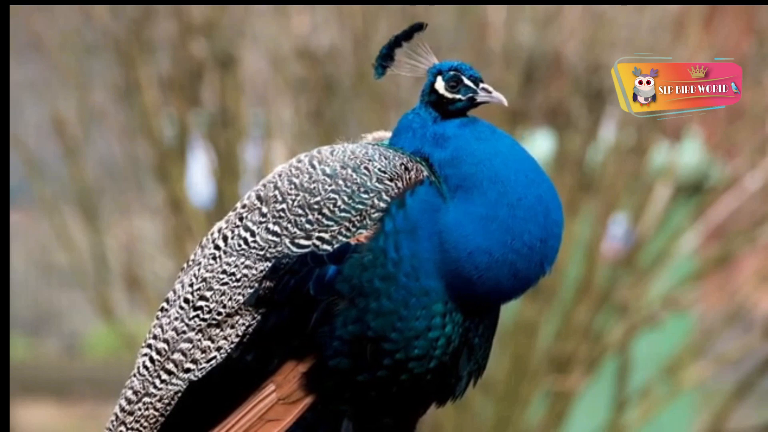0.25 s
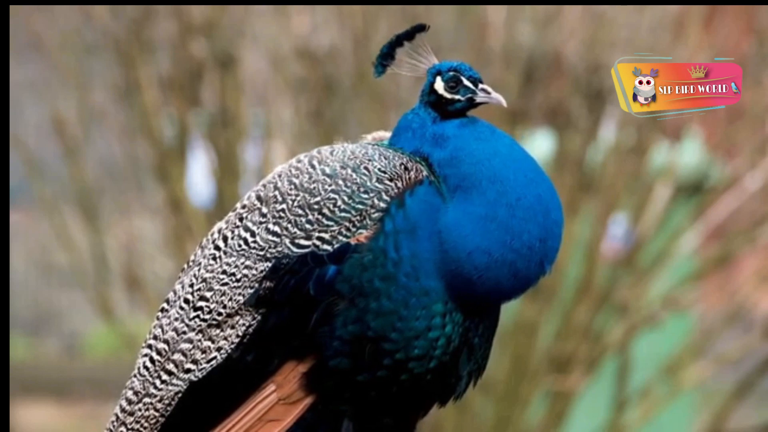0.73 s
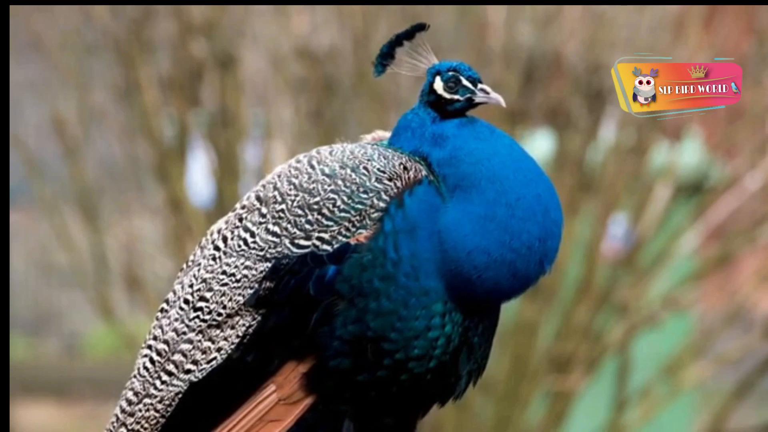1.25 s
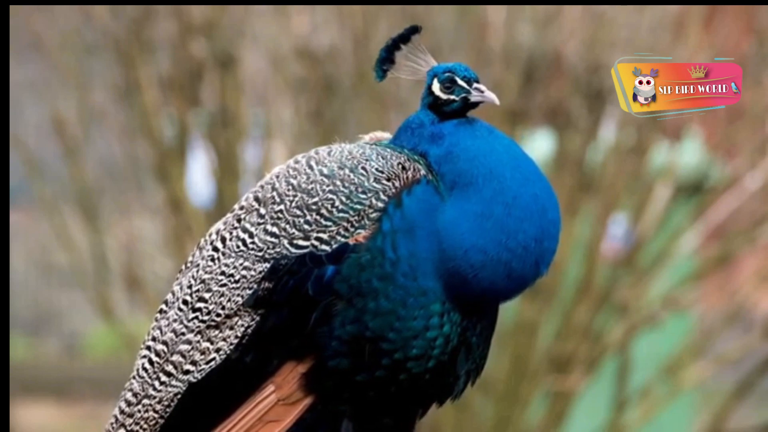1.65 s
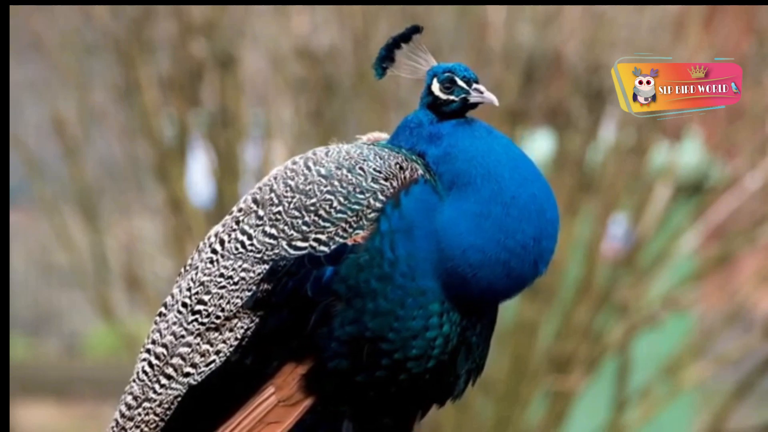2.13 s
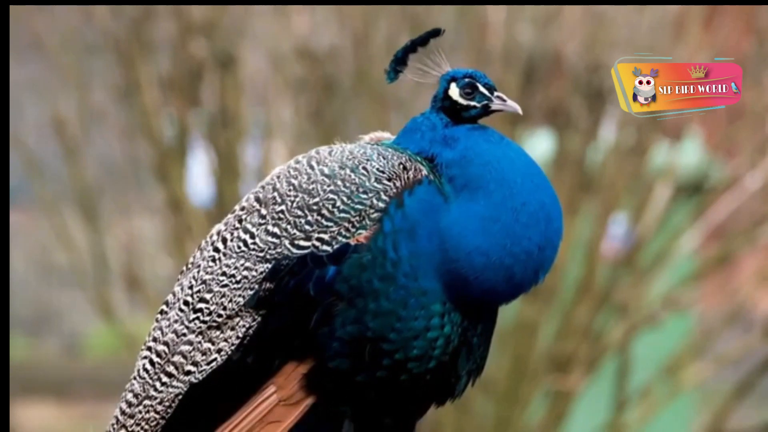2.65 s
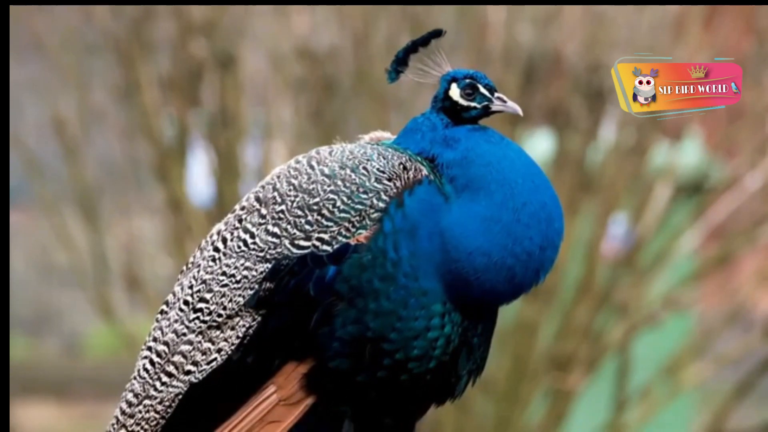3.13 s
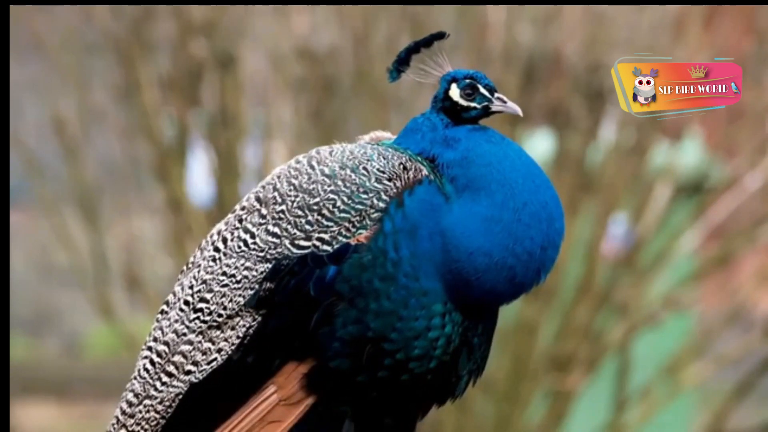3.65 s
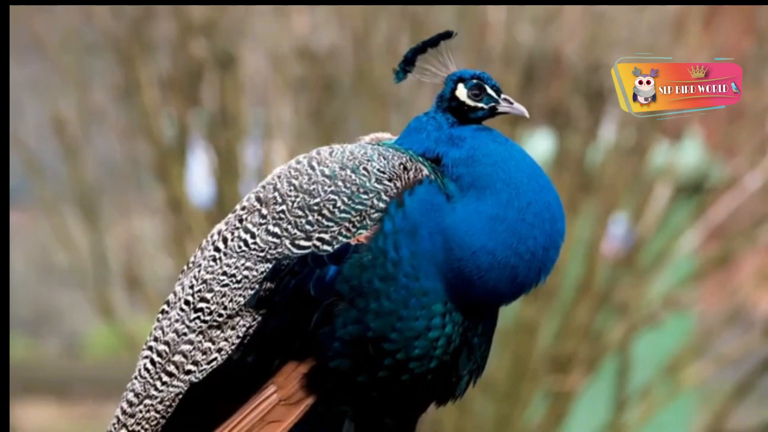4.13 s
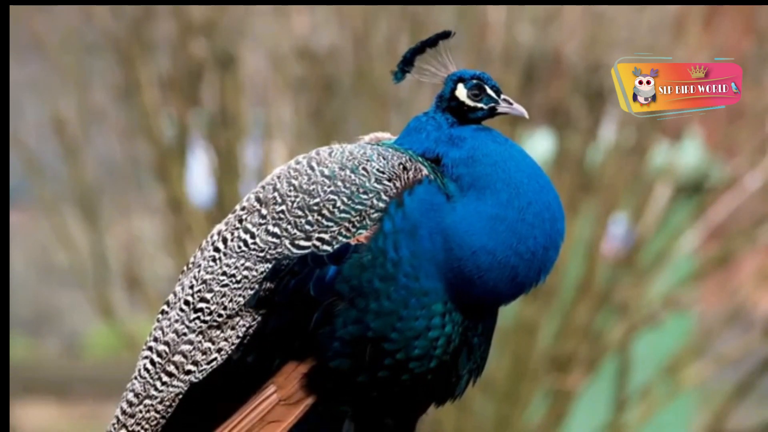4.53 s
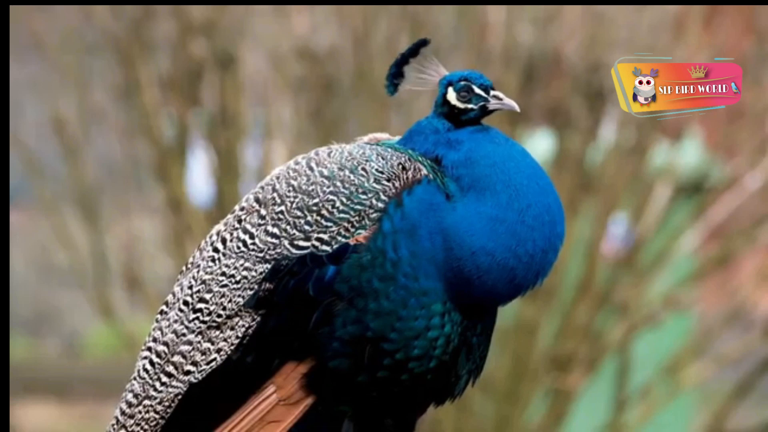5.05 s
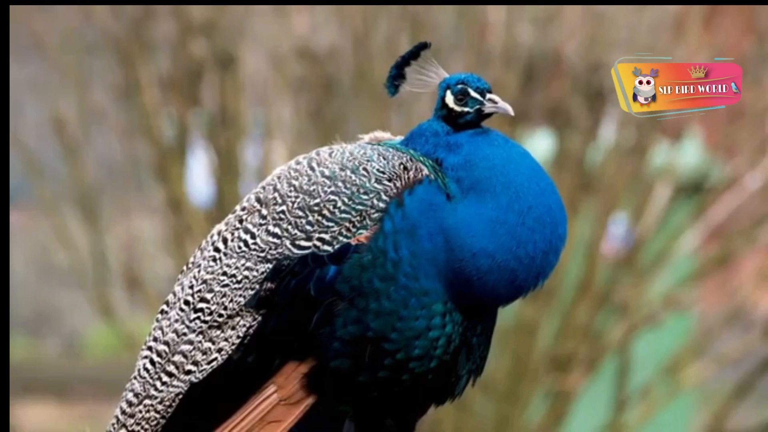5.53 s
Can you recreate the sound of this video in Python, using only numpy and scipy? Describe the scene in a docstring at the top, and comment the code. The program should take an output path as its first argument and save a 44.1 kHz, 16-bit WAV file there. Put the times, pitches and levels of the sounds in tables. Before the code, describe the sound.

Outdoors among trees, a peacock close to the microphone gives a long rising and falling nasal wail at once, then at two seconds a short harsh honk and a second, higher wail. Echoes scatter in the trees. A thin high cricket buzz, soft hiss and tiny bird chirps lie beneath. Just before four seconds the air and echoes cut off, leaving fainter hiss, buzz and distant hoarse cries.

```python
"""A garden with trees: close to the microphone a peacock gives a long rising and falling wail, a short
harsh honk and a second, higher wail, each a sum of overtones of a beating syrinx shaped by throat and beak.
Near surfaces colour the calls and the trees answer with noise-built tails, over soft coloured-noise air.
A bush cricket buzzes high, as pulsed noise; small birds whistle far off as gliding sines, amid faint ticks,
and a distant bird cries hoarsely. Soon after the last wail comes a cut: the louder air and the echoes stop
at once, leaving fainter air."""
import sys
import numpy as np
from scipy import signal
from scipy.fft import rfft, irfft, next_fast_len
from scipy.io import wavfile
from scipy.ndimage import map_coordinates

SR = 44100
rng = np.random.default_rng(int(sys.argv[2]) if len(sys.argv) > 2 else 0)


def generate_wav(signal):
    """Clip the signal to [-1, 1] and save it as 16-bit WAV at the path in sys.argv[1]."""
    frames = np.transpose(np.atleast_2d(signal))
    scaled = np.clip(frames, -1, 1) * 32767
    pcm = np.round(scaled).astype(np.int16)
    wavfile.write(sys.argv[1], SR, pcm)


N = 254898  # length in samples
TOP_HZ = 15750  # upper limit of the call's treble and of the recorder


def amp(db):
    """Decibels to gain."""
    return 10 ** (np.asarray(db) / 20)


def unit(x):
    """Scale to rms 1."""
    return x / np.sqrt(np.mean(x ** 2) + 1e-20)


def along(points, hz):
    """Read (f/Hz, value) points on a log frequency axis."""
    f, value = np.transpose(points)
    return np.interp(np.log(hz + 1), np.log(f + 1), value)


def curves(rows, t):
    """Each column after the time, read at times t."""
    s, *columns = np.transpose(rows)
    return [np.interp(t, s, column) for column in columns]


def wobble(rate, size):
    """A smooth random curve, rate knots a second."""
    knots = rng.standard_normal(8192)
    return map_coordinates(knots, [np.arange(size) * rate / SR], mode="wrap")


def filtered(x, response):
    """Multiply the spectrum of x by a response of frequency."""
    size = x.shape[-1]
    padded = next_fast_len(size + SR // 2)
    spectrum = rfft(x, padded) * response(np.fft.rfftfreq(padded, 1 / SR))
    return irfft(spectrum, padded)[..., :size]


def add(track, s, sound):
    """Mix a sound into a track at time s."""
    part = track[max(0, round(s * SR)):][:len(sound)]
    part += sound[:len(part)]


def rush(spectrum, alike):
    """Coloured stereo noise of rms 1, its two sides as alike as asked at each frequency."""
    def mid_and_side(hz):
        turn = np.arccos(np.clip(along(alike, hz), -1, 1)) / 2
        return amp(along(spectrum, hz)) * [np.cos(turn), np.sin(turn)]

    mid, side = filtered(rng.standard_normal((2, N)), mid_and_side)
    return unit(np.array([mid + side, mid - side]))


def reverb(x, decay):
    """A stereo noise tail in which each frequency dies at its own speed (f/Hz, t60/s)."""
    hz, t, z = signal.stft(rng.standard_normal((2, 2 * SR)), SR, nperseg=256)
    dying = z * amp(-60 * t / along(decay, hz)[:, None])
    tail = signal.istft(dying, SR, nperseg=256)[1]
    return signal.fftconvolve(x[None], tail / np.linalg.norm(tail[0]), axes=1)[:, :N]


# colour of the louder air, heard until the cut: [f/Hz, relative level/dB per Hz]
LOUDER_AIR_COLOUR = [(25, -6.5), (70, -3), (140, -6.5), (200, 0.5), (300, -5.5), (450, -5.5), (750, -8),
                     (2000, -10.5), (2900, -16.5), (4900, -9.5), (6500, -11), (9700, -11.5), (11200, -21.5),
                     (15000, -23)]
# colour of the fainter air beneath it: [f/Hz, relative level/dB per Hz]
FAINTER_AIR_COLOUR = [(25, -20.5), (70, -11), (150, -9.5), (400, -11), (750, -11), (1700, -14),
                      (2400, -23.5), (3300, -19), (5000, -18.5), (7400, -12.5), (9600, -30), (15000, -36)]
# how alike left and right are in both airs: [f/Hz, likeness 0-1]
AIR_LIKENESS = [(30, 1), (150, 1), (400, .92), (900, 1), (2000, 0.096), (8000, 0.038)]
# course of the louder air, before the 8 dB lift below: [t/s, level/dB]
AIR_COURSE = [(0, -59), (.8, -62.5), (2.0, -58.5), (2.3, -63.5), (3.9, -63.5)]


def louder_air(t):
    """Soft air in the garden: coloured noise with a slowly moving level."""
    return amp(curves(AIR_COURSE, t)[0] + 8) * rush(LOUDER_AIR_COLOUR, AIR_LIKENESS)


def fainter_air():
    """The steady, fainter air that lies under everything: coloured noise at -65.5 dB rms."""
    return amp(-65.5) * rush(FAINTER_AIR_COLOUR, AIR_LIKENESS)


# partials of an earlier honk still ringing in the trees: [f/Hz, level/dB at t = 0]
RINGING_PARTIALS = [(661.5, -56.5), (1323, -52.5), (1987, -48)]


def lingering_honk(t60=1.9):
    """The dying ring of a call made just before: sines that decay with a wavering level."""
    t = np.arange(N) / SR
    ring = np.zeros(N)
    for hz, db in RINGING_PARTIALS:
        level_db = db - 60 * t / t60 + 1.4 * wobble(25.8, N)
        ring += amp(level_db) * np.sin(2 * np.pi * hz * t)
    return ring


STROKE_HZ = 145  # mean wing stroke rate
RAMP_S, FADE_DB_PER_S = 0.0401, 0.64  # a bout's edges, its slow fade
REST_DB = -64  # the buzz left between bouts, before the side gains
# resonance of the cricket's wing: [f/Hz, relative level/dB per Hz]
WING_RESONANCE = [(6000, -50), (8000, -15), (8900, -22.5), (9500, -6.5), (10000, -4), (10350, -10.5),
                  (10700, -21.5), (11200, -34.5), (12400, -34.5), (13000, -42), (15500, -39)]
# bouts of song: [start t/s, end t/s, starting level/dB before the side gains]
BOUTS = [(-.1, 4.26, -53), (4.42, 5.63, -56)]


def cricket(sharpness=3, depth=0.42):
    """Each wing stroke scrapes the file harder for half a cycle and rings the wing; song comes in bouts."""
    t = np.arange(N) / SR
    stroke = np.sin(2 * np.pi * (STROKE_HZ * t + 0.1 * wobble(2.7, N)))
    scrape = 1 + depth * np.tanh(sharpness * stroke)
    song = np.zeros(N)
    for start, end, db in BOUTS:
        edges = np.clip(np.minimum(t - start, end - t) / RAMP_S + .5, 0, 1)
        song += amp(db - FADE_DB_PER_S * (t - start)) * edges
    buzz = unit(scrape * rush(WING_RESONANCE, [(10000, 0.13)]))
    side_gains = amp([[2], [-5.5]])  # stronger on the left
    return np.maximum(song, amp(REST_DB)) * buzz * side_gains


EDGE_S = .008  # a cry fades in and out over this time


def span(start, end):
    """The sample times of a cry, with room for its edges."""
    return np.arange(int((end - start + EDGE_S) * SR)) / SR + start - EDGE_S / 2


def scoop(age, note_hz, scoop_hz, scoop_s):
    """The pitch slides up from below and settles on a note."""
    return note_hz - scoop_hz * np.clip(1 - age / scoop_s, 0, 1) ** 2


JUMP_SHARE, JUMP_S = .413, 0.037  # the quick part of the upward break and its time constant
BLOOM_S = 0.17  # the second partial swells late after the break
# roughness: held tone, added at the onset, at the break, and per second of the fall
HELD_ROUGH, ONSET_ROUGH, BREAK_ROUGH, FALL_ROUGH_PER_S = 0.033, 0.15, .18, .18
ONSET_S, BREAK_S = 0.039, .033  # how long onset and break stay rough
# a wail scoops up to a low note, breaks upward, climbs towards its top and sags:
# [start t/s, end t/s, low note f/Hz, scoop/Hz, scoop/s, break t/s, top f/Hz, climb/s,
#  fall t/s, sag/Hz per s, bend into the fall/s, easing of the sag/per s]
WAIL_SHAPES = [(.048, 1.0, 615.9, 61.4, .064, .135, 867, .155, .566, 517.8, .048, 0.017),
               (2.61, 3.685, 701.5, 104.1, .085, 2.729, 898.2, .096, 3.205, 588.2, .04, .33)]


def wail(shape, bloom_db):
    """Times, pitch, roughness and the second partial's dip (dB) through a wail."""
    (start, end, low_hz, scoop_hz, scoop_s, break_at,
     top_hz, climb_s, fall_at, sag, bend_s, ease) = shape
    t = span(start, end)
    since = np.maximum(t - break_at, 0)
    jump = 1 - np.exp(-since / JUMP_S)
    climb = 1 - np.exp(-since / climb_s)
    rise = JUMP_SHARE * jump + (1 - JUMP_SHARE) * climb
    falling = bend_s * np.logaddexp(0, (t - fall_at) / bend_s)  # s into the fall, bent in smoothly
    pitch = scoop(t - start, low_hz, scoop_hz, scoop_s) + (top_hz - low_hz) * rise
    pitch = pitch - sag * falling * (1 - ease * falling)
    crack = since / BREAK_S * np.exp(1 - since / BREAK_S)
    rough = HELD_ROUGH + ONSET_ROUGH * np.exp((start - t) / ONSET_S)
    rough = rough + BREAK_ROUGH * crack + FALL_ROUGH_PER_S * falling
    return t, pitch, rough, -bloom_db * jump * np.exp(-since / BLOOM_S)


DROOP_HZ, DROOP_S = 26, 0.017  # the honk's pitch slackens as it ends
HONK_ROUGH, HONK_CLEARS_S = 0.06, 0.04  # the honk starts wholly rough and clears to this
# the honk is a low note alone: [start t/s, end t/s, note f/Hz, scoop/Hz, scoop/s]
HONK_SHAPE = (2.115, 2.292, 706.3, 110, 0.087)


def honk():
    """The same controls for the honk: a harsh attack clears into one firm note."""
    start, end, note_hz, scoop_hz, scoop_s = HONK_SHAPE
    t = span(start, end)
    droop = DROOP_HZ * np.exp((t - end) / DROOP_S)
    pitch = scoop(t - start, note_hz, scoop_hz, scoop_s) - droop
    rough = HONK_ROUGH + np.exp(-((t - start) / HONK_CLEARS_S) ** 2)
    return t, pitch, rough, 0


USUAL_PITCH_HZ = 781  # the pitch at which the throat's resonances are unshifted
REGISTER_WIDTH_HZ = 6.9  # scale of pitch over which the dull low voice turns bright
TWANG_HZ, TWANG_WIDTH_HZ, TWANG_DB = 3800, 620, 6  # nasal resonance of the low register
# resonances under the three low partials: [f/Hz, relative level/dB]
LOW_RESONANCES = [(560, -9), (730, -19.5), (800, -7), (900, -16), (1230, -3.5), (1390, -11), (1480, 1.5),
                  (1680, 5), (1790, -1.5), (1880, -6), (2060, -1), (2220, -10.5), (2400, -17.5),
                  (2700, -29.5)]
# hiss of air in the open beak: [f/Hz, relative level/dB per Hz]
BEAK_HISS = [(2000, -31), (4500, -18), (6300, -2), (8000, -1), (9500, -2), (11000, -10.5), (12500, -22),
             (15000, -32.5)]


def call(gesture, effort, throat, first_db, treble_db, tilt_db, dull_db, register_hz, scatter, shimmer,
         rasp_db, hiss_db, drift_db, waver, rolloff_db, spread_hz, gape, count=24):
    """One cry: the syrinx beats at the pitch, its overtones sweep through the throat's resonances."""
    t, pitch, rough, second_db = gesture
    size = len(t)
    body_db, bright_db = curves(effort, t)
    rough = np.clip(rough, 0, 1)
    pitch = pitch * (1 + waver * wobble(76, size))
    # uneven beats smear the high partials first
    phase = 2 * np.pi * (np.cumsum(pitch) / SR + scatter * rough * wobble(800, size))
    k = np.arange(count)[:, None] + 1
    hz = k * pitch
    low = k <= 3

    # the low register is dull, the high one bright (dB per octave)
    low_register = 1 / (1 + np.exp((pitch - register_hz) / REGISTER_WIDTH_HZ))
    slope_db = tilt_db - dull_db * low_register
    twang_db = TWANG_DB * low_register * np.exp(-((hz - TWANG_HZ) / TWANG_WIDTH_HZ) ** 2)
    # the beak opens with the pitch and lifts the resonances
    stretch = (pitch / USUAL_PITCH_HZ) ** gape
    drift = np.array([wobble(20, size) for _ in k])
    shape_db = along(throat, hz / stretch) + slope_db * np.log2(k) + twang_db + drift_db * drift
    # partials 14 to 18 step down by their number (up if the rolloff is negative)
    shape_db = shape_db - rolloff_db * np.clip(k - 13, 0, 5)
    treble = amp(shape_db) * ~low * (hz < TOP_HZ)
    body = amp(along(LOW_RESONANCES, hz) + first_db * (k == 1) + second_db * (k == 2)) * low
    gain = amp(body_db) * body / np.linalg.norm(body, axis=0)
    gain = gain + amp(bright_db + treble_db) * treble / np.linalg.norm(treble, axis=0)

    lag = (hz / spread_hz) ** 2  # the windpipe spreads each beat out in time
    voice = np.sqrt(2) * np.sum(gain * np.cos(k * phase - lag), axis=0)
    voice = voice * (1 + shimmer * rough * wobble(500, size))

    # air rasps in ragged puffs where the voice is rough; the smoother held tone has little
    beats = 1 + np.cos(phase)
    puffs = rng.standard_normal(size) * beats * amp(0.61 * wobble(300, size))
    rasp_colour = [(500, -34.5), (1000, -1.5), (1500, 5.5), (2000, 0.5)] + list(throat)
    rasp = unit(filtered(puffs, lambda f: amp(along(rasp_colour, f))))
    breath = rng.standard_normal(size) * beats
    hiss = unit(filtered(breath, lambda f: amp(along(BEAK_HISS, f))))
    cry = voice + rough ** 2 * amp(bright_db + rasp_db) * rasp
    cry = cry + np.sqrt(rough) * amp(bright_db + hiss_db) * hiss

    gate = np.clip(np.minimum(t - t[0], t[-1] - t) / EDGE_S, 0, 1)
    track = np.zeros(N)
    add(track, t[0], gate * cry)
    return track


# effort of each call, before treble_db and the mix gains:
# [t/s, level of the three low partials/dB, level of the treble/dB]
EFFORT_FIRST = [(0.048, -38, -43), (0.074, -36, -36.5), (0.156, -29.5, -32), (0.172, -21.5, -29),
                (0.182, -25, -24.5), (0.236, -22, -39), (0.392, -16, -34.5), (0.562, -15, -29),
                (0.672, -20.5, -28.5), (0.74, -19, -34.5), (0.778, -19, -30.5), (0.816, -24, -34),
                (0.936, -24.5, -36.5), (0.962, -31, -33), (0.992, -36.5, -39), (1.0, -32.5, -35.5)]
EFFORT_SHORT = [(2.115, -40.5, -47), (2.129, -34.5, -25.5), (2.149, -29, -22.5), (2.205, -22.5, -20.5),
                (2.271, -23.5, -19), (2.292, -32.5, -37.5)]
EFFORT_SECOND = [(2.61, -44.5, -50), (2.62, -38, -44.5), (2.66, -26.5, -39), (2.69, -25.5, -27),
                 (2.752, -25.5, -30), (2.762, -23.5, -23), (2.912, -17.5, -29), (3.156, -15, -24),
                 (3.312, -16, -27.5), (3.374, -21.5, -33.5), (3.498, -23, -27), (3.582, -25, -31.5),
                 (3.606, -24, -35.5), (3.626, -29, -30.5), (3.674, -33.5, -39.5), (3.685, -48, -46)]
# throat and open beak above the third partial, per call: [f/Hz, relative level/dB]
THROAT_FIRST = [(2420, -9), (2760, -5.5), (3260, -3.5), (3880, -4.5), (4210, -12.5), (4740, -3),
                (5410, -14), (6100, 0.5), (7060, -3.5), (7280, -1), (8280, 0.5), (9580, -10), (10910, -15),
                (14480, -34)]
THROAT_SHORT = [(2800, -12), (3550, -3.5), (4260, -1.5), (4950, -5.0), (5700, -5), (6400, 0), (7100, -4.5),
                (8500, -4), (9200, -11.5), (9890, -12), (10600, -20.5), (11410, -27.5), (15000, -41.5)]
THROAT_SECOND = [(2500, -22.5), (3200, -13.5), (3900, -22), (4350, -12.5), (4750, -17.5), (5250, -11),
                 (6300, -3), (7100, -7), (8200, -1.5), (8800, -11), (9650, -0.5), (10600, -7.5),
                 (11700, -15.5), (15300, -26.5)]


def peacock():
    """The bird close by: wail, honk, higher wail, each with its own effort and throat."""
    first = call(wail(WAIL_SHAPES[0], bloom_db=17.5), EFFORT_FIRST, THROAT_FIRST,
                 first_db=1.5, treble_db=0, tilt_db=-0.5, dull_db=8, register_hz=687,
                 scatter=0.018, shimmer=.16, rasp_db=-5.5, hiss_db=-7, drift_db=2,
                 waver=0.0017, rolloff_db=0.8, spread_hz=1500, gape=0.14)
    short = call(honk(), EFFORT_SHORT, THROAT_SHORT,
                 first_db=-4.5, treble_db=0.55, tilt_db=-0.14, dull_db=6.5, register_hz=625,
                 scatter=0.03, shimmer=0.43, rasp_db=0.5, hiss_db=-14.5, drift_db=2.5,
                 waver=0.0002, rolloff_db=-0.54, spread_hz=1900, gape=.06)
    second = call(wail(WAIL_SHAPES[1], bloom_db=12), EFFORT_SECOND, THROAT_SECOND,
                  first_db=-8.5, treble_db=-0.14, tilt_db=0.53, dull_db=12.5, register_hz=714,
                  scatter=.02, shimmer=0.31, rasp_db=-4.5, hiss_db=-10.5, drift_db=3.16,
                  waver=0.0011, rolloff_db=2.3, spread_hz=970, gape=.1)
    return first + amp(0.1) * short + amp(0.12) * second


# ground and fence near the microphone, each side: [delay t/s, gain]
NEAR_SURFACES_LEFT = [(.0031, 0.0082), (.0074, -0.047), (.0128, .06), (.023, 0.0098)]
NEAR_SURFACES_RIGHT = [(.0031, -0.013), (.0076, 0.00092), (.0132, .06), (.022, 0.015)]
# far walls, before their dulling: [delay t/s, level/dB]
WALL_ECHOES = [(.095, -23), (0.169, -36), (.25, -40), (0.336, -31.5), (0.521, -38), (0.877, -43.5)]
# decay of the trees' answer: [f/Hz, t60/s]
TREE_DECAY = [(500, 0.39), (1700, 1.75), (4000, 0.67), (8000, 1.2), (14000, 0.15)]
# left minus right of the calls: [f/Hz, level/dB]
SIDE_BALANCE = [(800, 0.5), (1400, -7), (1750, -4), (2100, -3.5), (2600, -1.5), (3600, 0.5), (4300, -9.5),
                (5500, -2), (6800, -6.5), (7800, 5), (8500, -2.5), (9300, 4.5), (10700, 18.5), (13000, -2)]


def surroundings(x, bush_db, tail_db):
    """Near surfaces comb the sound, bushes and trees scatter it, and far walls return dull echoes."""
    def comb(surfaces, hz):
        return sum(gain * np.exp(-2j * np.pi * hz * delay) for delay, gain in surfaces)

    def sides(hz):
        half_db = along(SIDE_BALANCE, hz) / 2
        return amp(np.array([half_db, -half_db]))

    near = x + filtered(x, lambda hz: np.array([comb(NEAR_SURFACES_LEFT, hz),
                                                comb(NEAR_SURFACES_RIGHT, hz)]))
    walls = [(delay, amp(db)) for delay, db in WALL_ECHOES]
    echoes = filtered(x, lambda hz: comb(walls, hz) / (1 + (hz / 2600) ** 2))
    bush_colour = [(700, -10.5), (1700, -6.5), (3000, 1.5), (5000, 2.5), (10000, 5.0)]
    scattered = reverb(x, [(1000, 0.28), (10000, 0.053)])
    bushes = filtered(scattered, lambda hz: amp(along(bush_colour, hz)))
    heard = near + echoes + amp(bush_db) * bushes + amp(tail_db) * reverb(x, TREE_DECAY)
    return filtered(heard, lambda hz: sides(hz) / sides(hz).mean(axis=0))


# small birds far off, from clear chirps to barely audible ones:
# [t/s, length/s, start f/Hz, end f/Hz, peak level/dB before the ring]
BIRD_CHIRPS = [(1.139, 0.12, 3600, 3710, -51), (1.155, 0.062, 7130, 7440, -52),
               (1.217, .06, 6340, 5500, -56), (1.898, 0.19, 4400, 6360, -52),
               (3.965, 0.05, 6960, 5700, -58), (3.975, 0.061, 7340, 7200, -59),
               (4.11, 0.066, 7300, 6800, -60), (4.243, 0.07, 7000, 5800, -60.5),
               (4.37, 0.072, 4410, 4700, -73), (4.61, .05, 3730, 3150, -71), (4.758, .1, 4670, 4790, -75),
               (5.098, 0.065, 3730, 3280, -73), (5.249, 0.092, 6800, 4900, -62.5)]


def small_birds():
    """Thin, clean gliding whistles: wavering sines with a short ring nearly as strong as the whistle."""
    track = np.zeros(N)
    for s, length, start_hz, end_hz, db in BIRD_CHIRPS:
        u = np.linspace(0, 1, int(length * SR))
        hz = (start_hz + (end_hz - start_hz) * u) * (1 + .004 * wobble(250, len(u)))
        whistle = np.sin(2 * np.pi * np.cumsum(hz) / SR)
        add(track, s, amp(db) * np.sin(np.pi * u) * whistle)
    return track + amp(-0.5) * reverb(track, [(5000, 0.18)])


# faint dry ticks, before the 6.5 dB cut below: [t/s, level/dB]
TICK_TIMES = [(1.5421, -45.5), (1.699, -35)]


def ticks(t60=0.023):
    """Faint dry ticks: short noise bursts that die at once."""
    track = np.zeros(N)
    t = np.arange(SR // 10) / SR
    colour = [(2000, -32), (4300, -1), (6000, -1.5), (12000, -20)]
    for s, db in TICK_TIMES:
        grain = unit(filtered(rng.standard_normal(len(t)), lambda hz: amp(along(colour, hz))))
        add(track, s, amp(db - 6.5 - 60 * t / t60) * grain)
    return track


# throat of the distant bird: [f/Hz, relative level/dB]
DISTANT_THROAT = [(400, -14), (780, -4.5), (1170, 2), (1700, 3.5), (2300, -18)]
# its cries: [t/s, length/s, start f/Hz, end f/Hz, level/dB before the blur]
DISTANT_CRIES = [(4.06, 0.31, 443, 329, -64.5), (4.6, 0.25, 438, 346, -62.5), (5.1, 0.122, 825, 777, -78),
                 (5.48, .08, 772, 730, -73.5)]


def far_calls(count=5):
    """A distant bird's hoarse, falling cries: unsteady harmonics blurred on their way through the trees."""
    track = np.zeros(N)
    k = np.arange(count)[:, None] + 1
    for s, length, start_hz, end_hz, db in DISTANT_CRIES:
        u = np.linspace(0, 1, int(length * SR))
        pitch = (start_hz + (end_hz - start_hz) * u) * (1 + .018 * wobble(300, len(u)))
        partials = np.sin(2 * np.pi * k * np.cumsum(pitch) / SR)
        cry = np.sum(amp(along(DISTANT_THROAT, k * pitch)) * partials, axis=0)
        swell = np.sqrt(np.abs(np.sin(np.pi * u)))
        add(track, s, amp(db) * swell * unit(cry))
    return reverb(track, [(1000, 0.65)])  # only the blurred sound arrives


CUT_S = 3.945


def scene():
    """The calls in their garden, over soft air, a cricket and distant birds."""
    t = np.arange(N) / SR
    calls = surroundings(peacock(), bush_db=-7.5, tail_db=-22.5) + lingering_honk()
    # at the cut the louder air and the calls' echoes stop together, within 6 ms
    before_cut = np.clip((CUT_S - t) / 0.006, 0, 1)
    garden = before_cut * (louder_air(t) + calls) + fainter_air()
    return garden + cricket() + small_birds() + ticks() + far_calls()


# gaps in the recorder's response: [centre f/Hz, width/Hz of a single pass]
RESPONSE_GAPS = [(2590, 142), (7690, 590)]


def record(dry):
    """The recorder: two deep notches, each passed twice, and a steep band limit."""
    def notch(hz):
        gaps = [(c * c - hz * hz) / (c * c - hz * hz + 1j * hz * w) for c, w in RESPONSE_GAPS]
        return np.prod(gaps, axis=0)

    return filtered(dry, lambda hz: notch(hz) ** 2 * (hz < TOP_HZ))


dry = scene()
out = record(dry)
generate_wav(out)
```